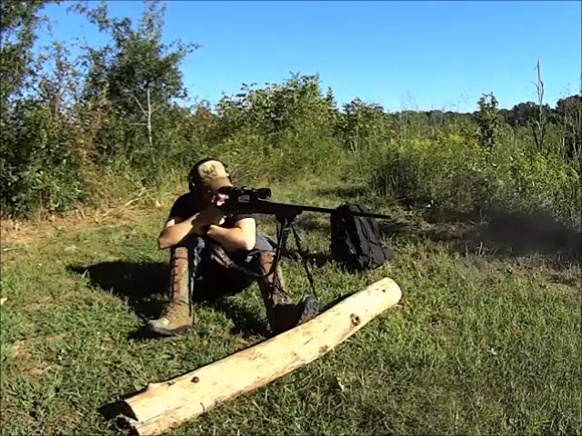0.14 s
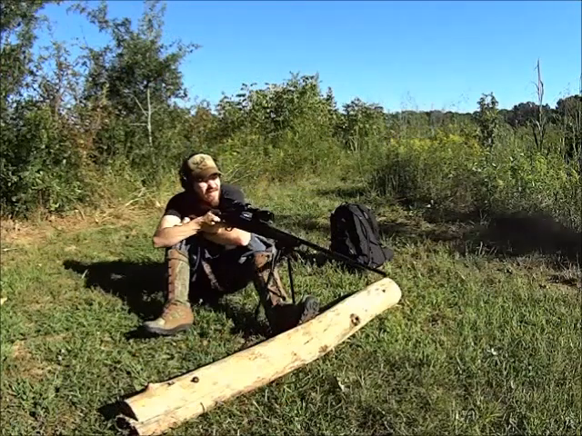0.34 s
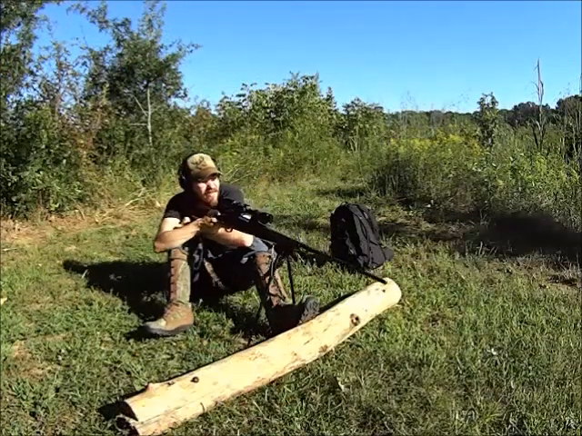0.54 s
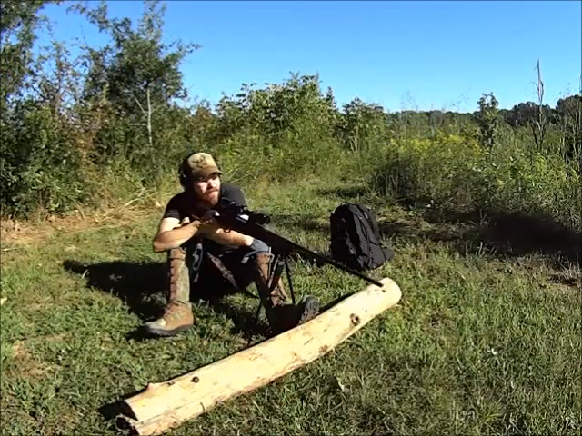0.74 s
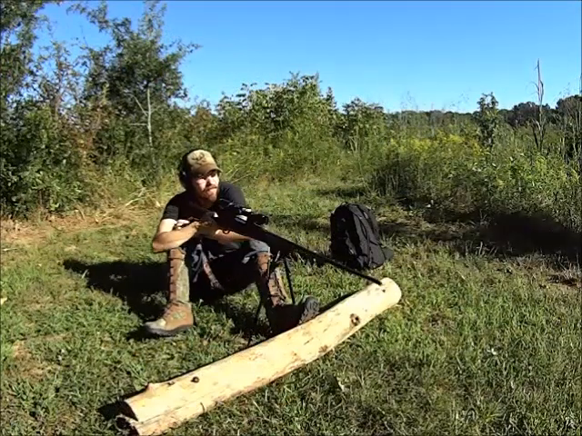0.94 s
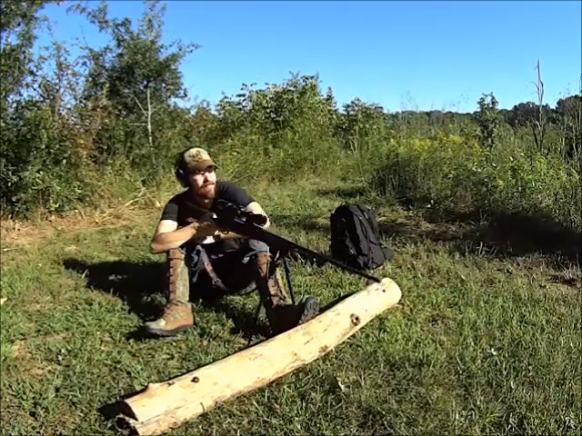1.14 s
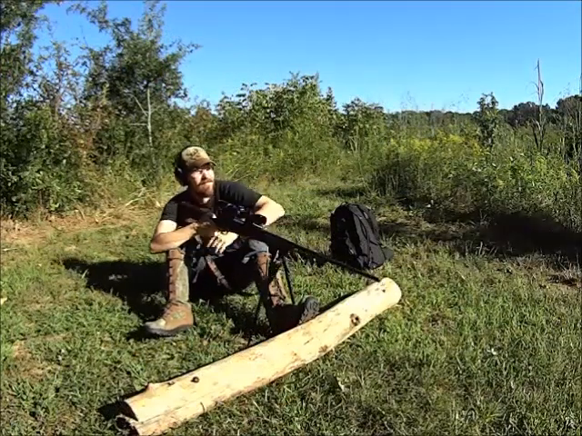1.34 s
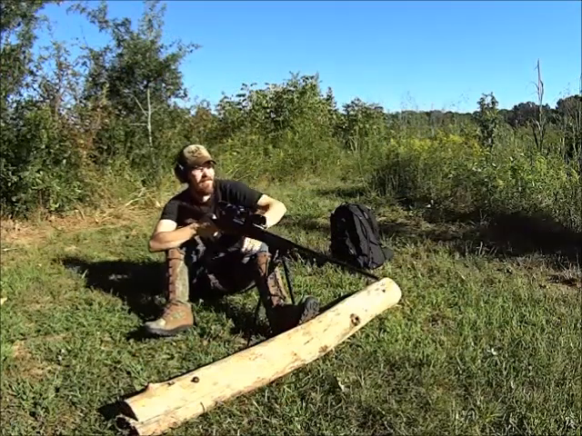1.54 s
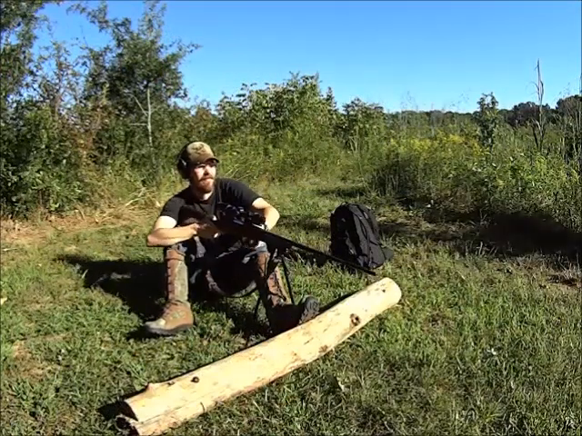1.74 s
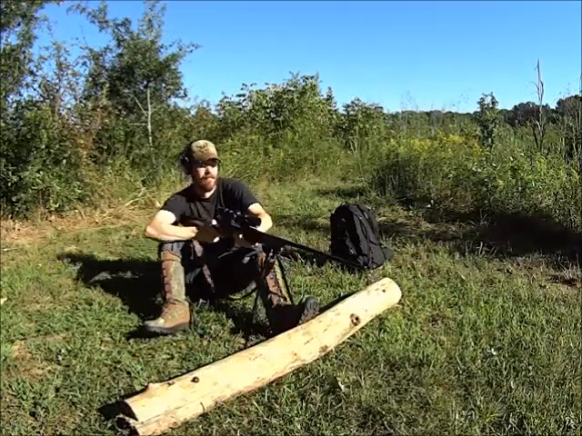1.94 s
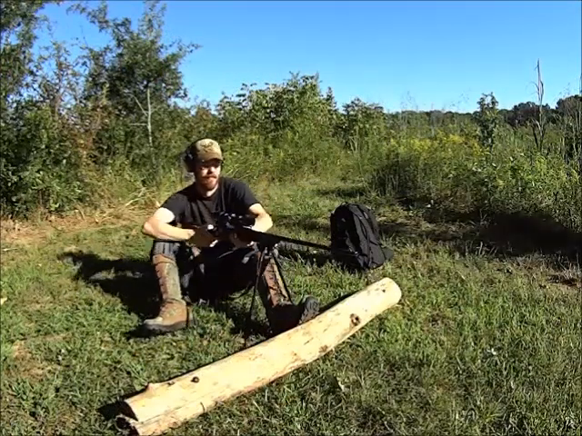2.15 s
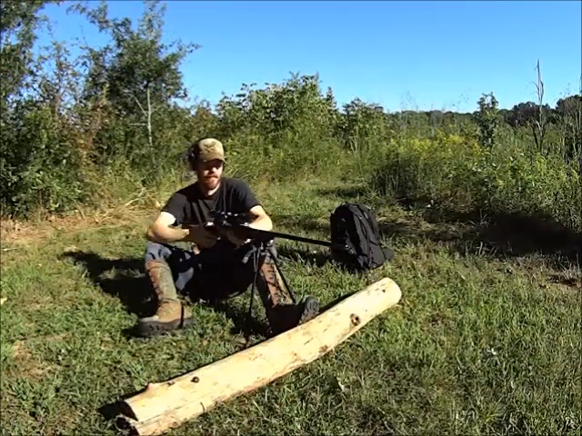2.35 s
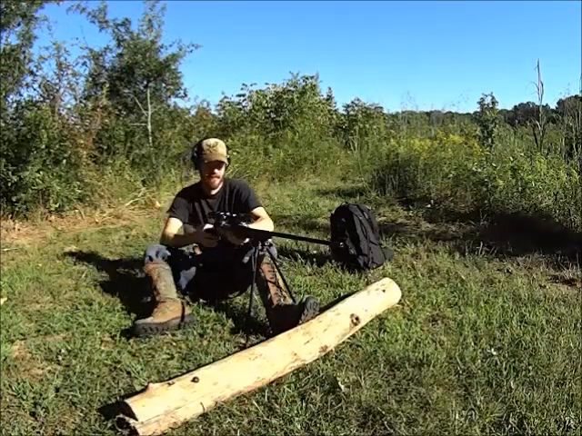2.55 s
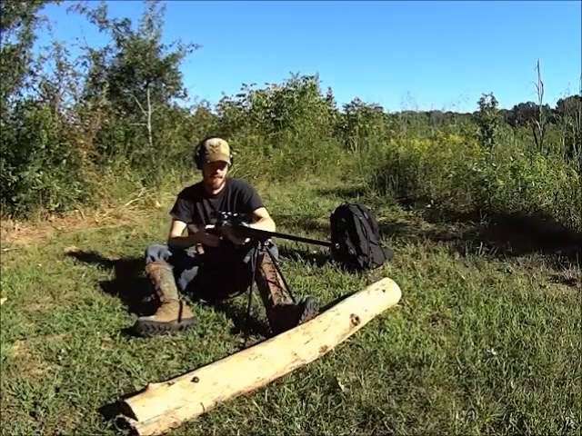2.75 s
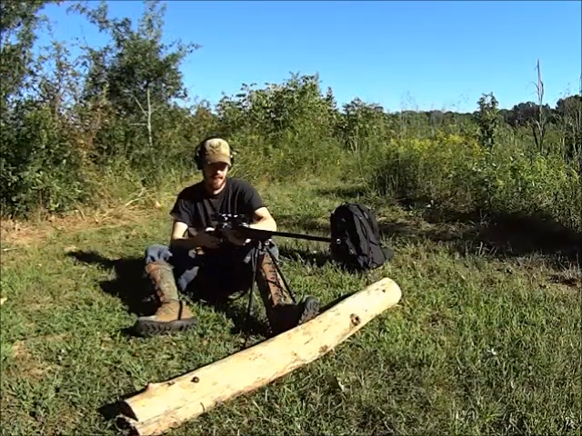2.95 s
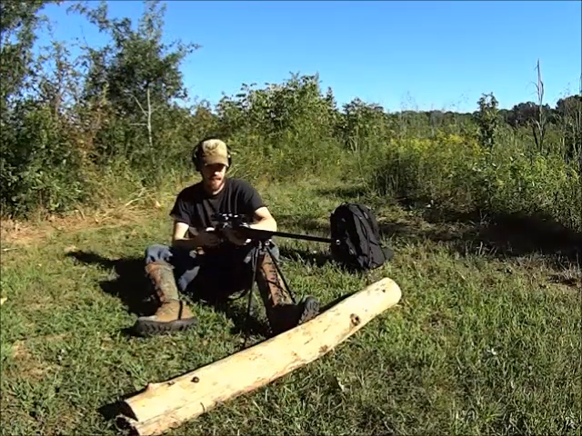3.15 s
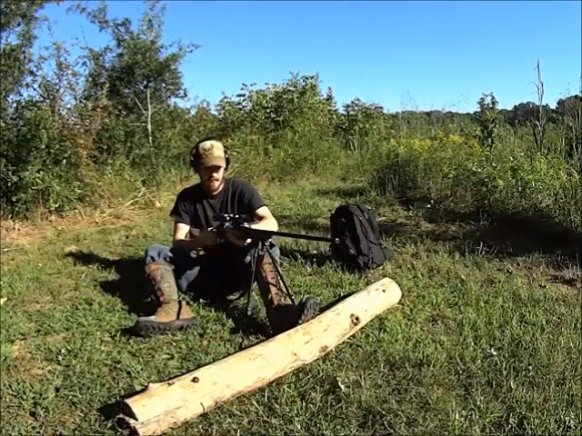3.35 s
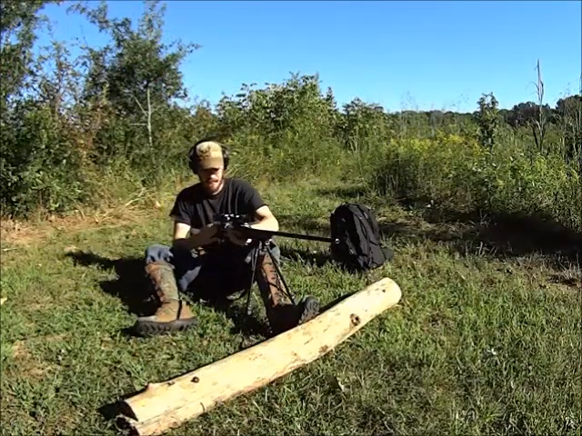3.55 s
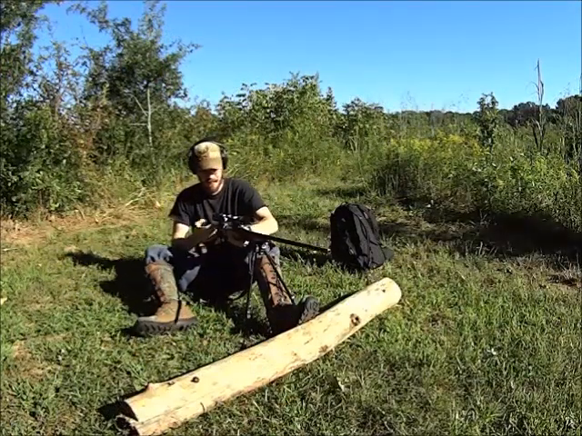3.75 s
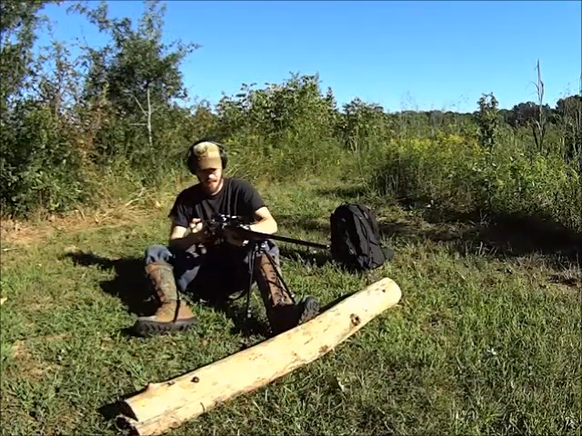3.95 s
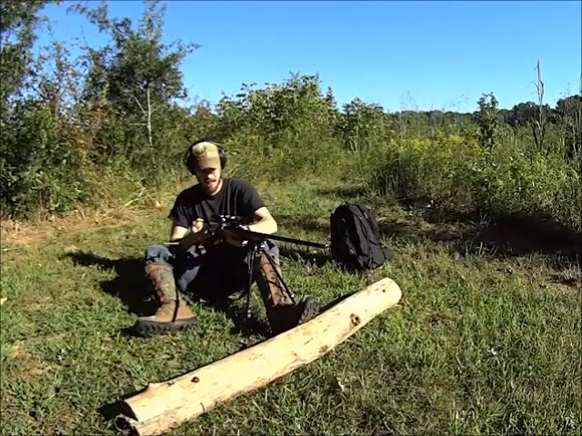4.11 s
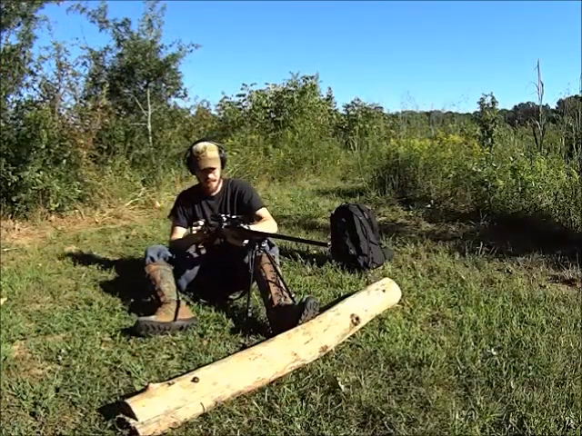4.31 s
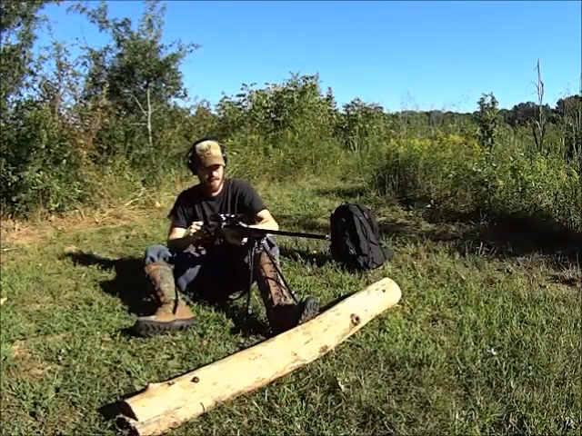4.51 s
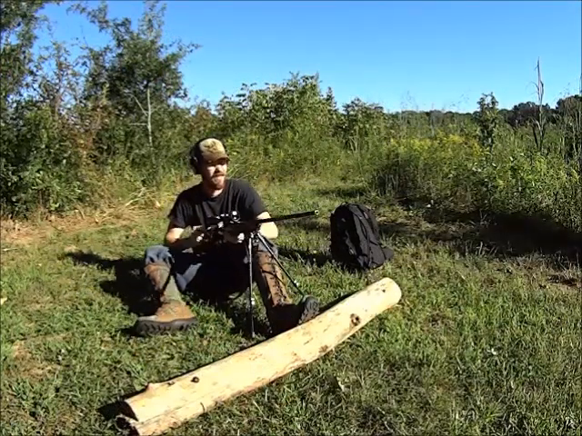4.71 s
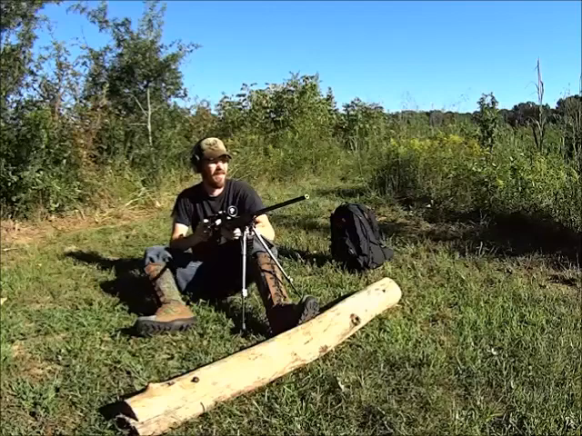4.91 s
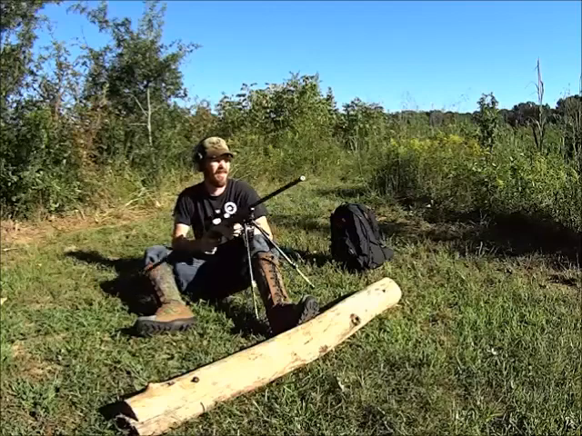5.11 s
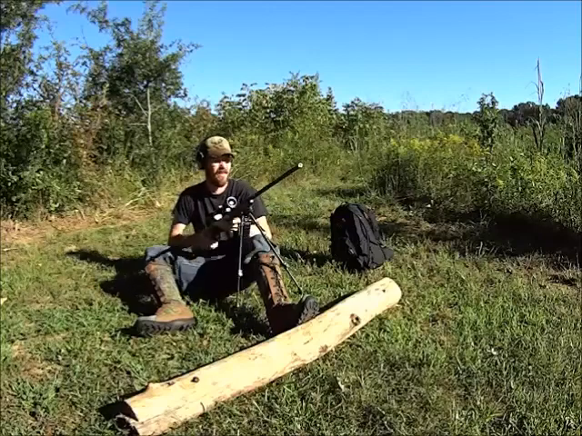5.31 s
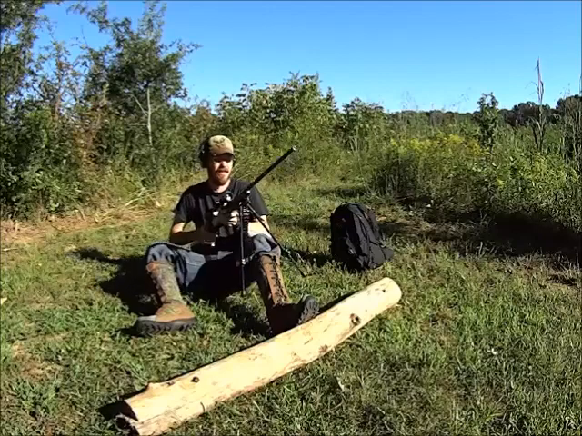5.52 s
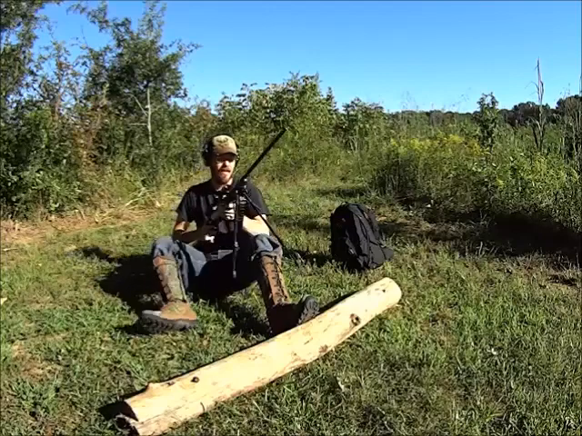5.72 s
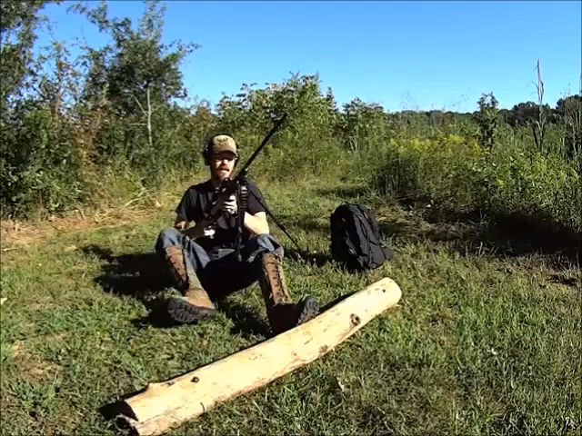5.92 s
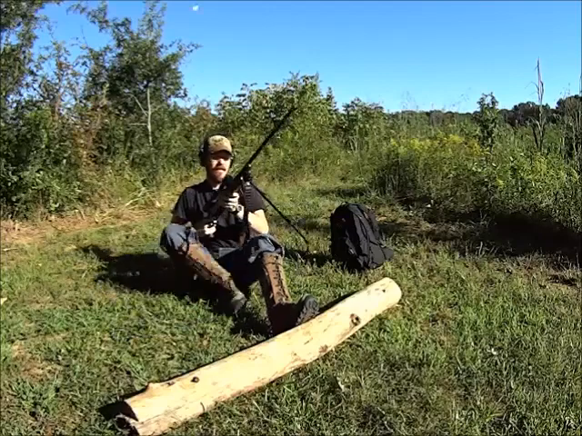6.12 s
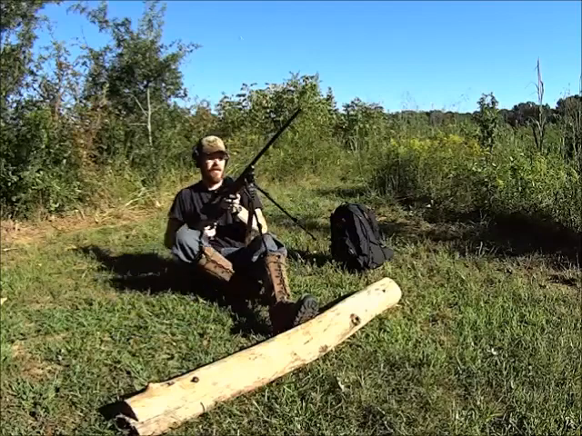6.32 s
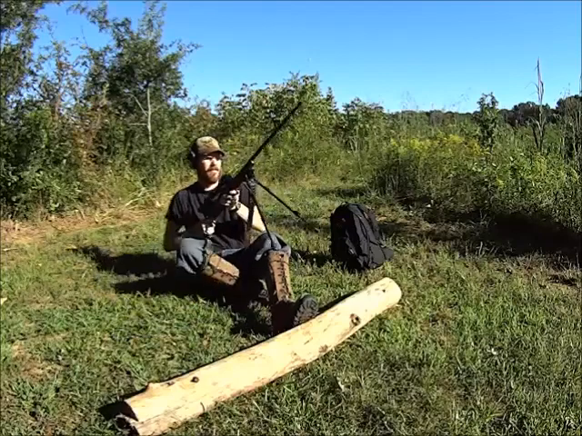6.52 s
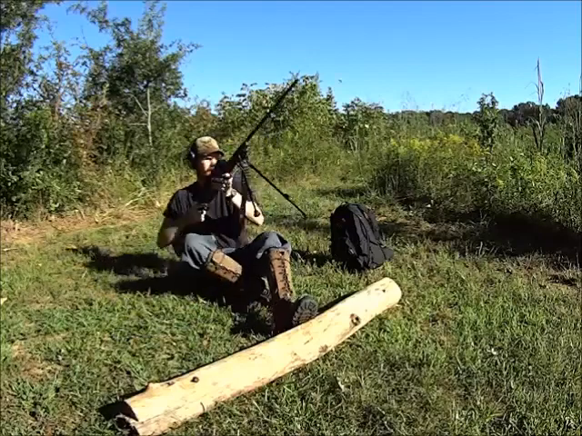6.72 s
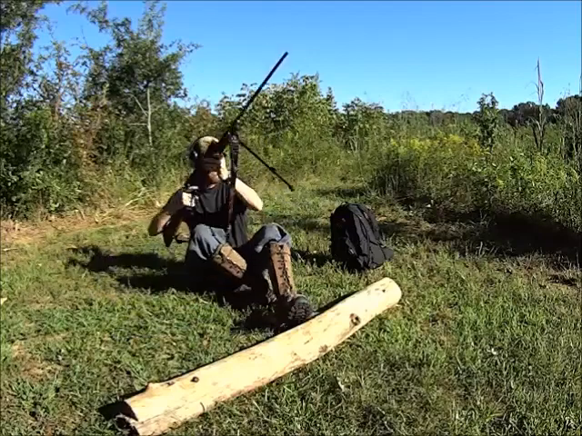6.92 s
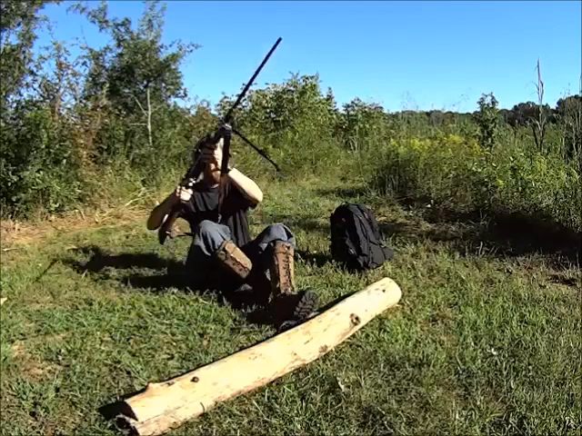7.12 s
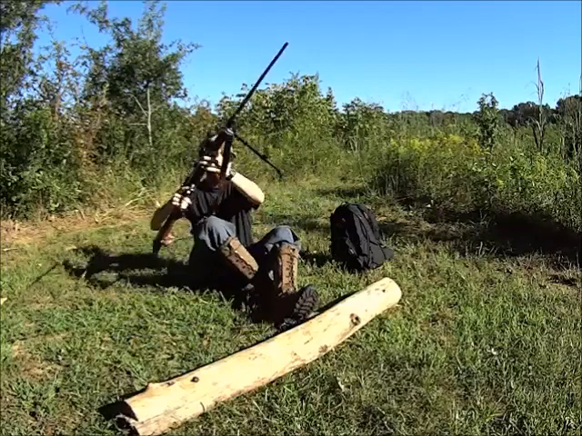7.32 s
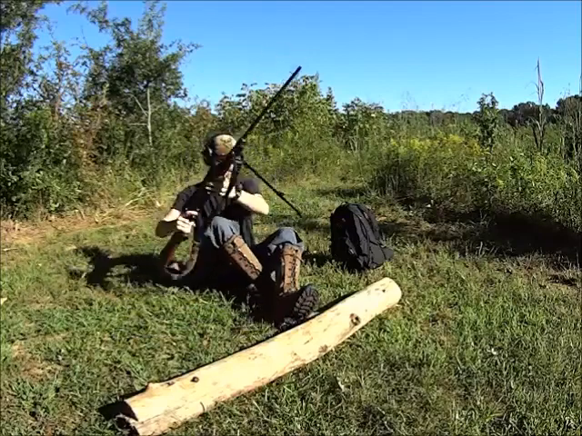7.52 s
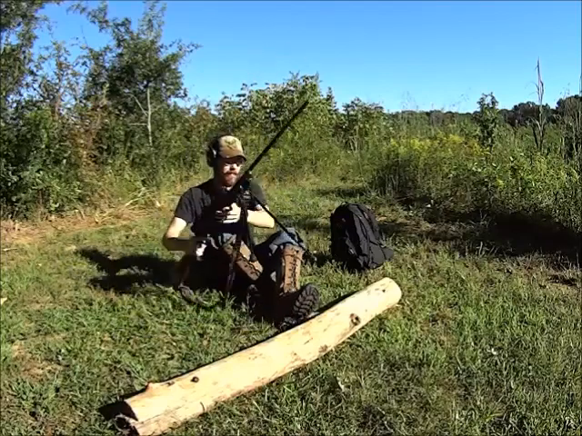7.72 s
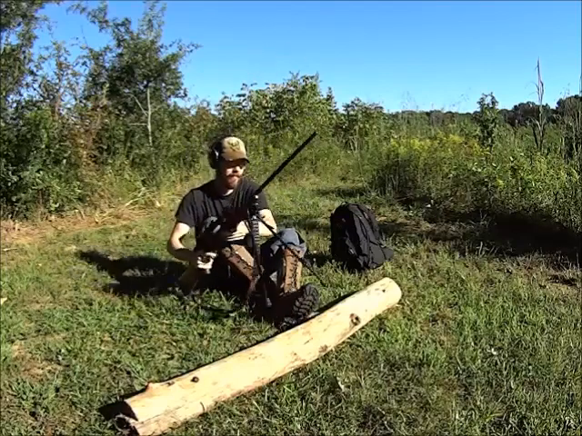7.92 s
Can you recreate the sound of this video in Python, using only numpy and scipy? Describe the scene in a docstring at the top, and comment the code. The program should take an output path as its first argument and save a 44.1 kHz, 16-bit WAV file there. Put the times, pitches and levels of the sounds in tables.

```python
"""A meadow edged by brush and tree lines, heard through a microphone pair.
Insects shrill over faint air and a low hum, all as shaped noise or sines, while an earlier shot still dies away.
One rifle shot: a noise crack, then a long roll of grainy echoes, duller the farther they travel.
The shooter works the bolt: bursts of steel-coloured noise clack, and decaying sines ring on.
The spent brass case rings in swelling sines and thuds on the ground; the bolt closes, a last catch clicks."""
import sys
import numpy as np
from scipy import signal
from scipy.fft import rfft, irfft, next_fast_len
from scipy.io import wavfile
from scipy.ndimage import uniform_filter1d

SR = 44100
rng = np.random.default_rng(int(sys.argv[2]) if len(sys.argv) > 2 else 0)


def generate_wav(signal):
    """Clip the signal to [-1, 1] and save it as 16-bit WAV at the path in sys.argv[1]."""
    frames = np.transpose(np.atleast_2d(signal))
    scaled = np.clip(frames, -1, 1) * 32767
    pcm = np.round(scaled).astype(np.int16)
    wavfile.write(sys.argv[1], SR, pcm)


N = 355446
TIME = np.arange(N) / SR
LEFT_SEED = np.array([[1], [0]])  # puts a sound in the first signal only, so both ports get the same wave

# Broad, well damped resonances of stock and action: (frequency [Hz], width [Hz], level [dB])
STEEL = [(733, 91, 8), (843, 140, 1.5), (1770, 420, 1.5), (1950, 390, 2), (2780, 210, 4.5),
         (3470, 440, 0.5), (4000, 220, -3.5), (5040, 900, 0), (7100, 1000, -1.5), (9580, 2500, -2.5)]
# The rifle as the microphone pair hears it: (frequency [Hz], likeness of the ports [0-1])
RIFLE = [(80, 0.26), (300, 1), (650, 0.86), (2000, 0.96), (10000, 0.83)]
# Phase by which the left port leads for the rifle: (frequency [Hz], lead [rad])
RIFLE_LEAD = [(170, 0.97), (500, 0.79), (1200, 1.43), (2000, 1.13), (3300, 0.38), (10000, 0.32)]
# Left port over right for the rifle: (frequency [Hz], level difference [dB])
RIFLE_PAN = [(300, 0.63), (1200, 3), (2300, 6.2), (4000, 1.8), (10000, 1)]


def amp(db):
    """Decibels to gain."""
    return 10 ** (np.asarray(db) / 20)


def unit(x):
    """Scales to rms 1."""
    return x / np.sqrt(np.mean(x ** 2) + 1e-20)


def read(points, hz):
    """Reads a (frequency, value) table on a log-frequency axis."""
    f, value = np.transpose(points)
    return np.interp(np.log(hz + 1), np.log(np.abs(f) + 1), value)


def add(mix, s, sound):
    """Mixes a sound in at time s."""
    part = mix[:, max(round(s * SR), 0):][:, :sound.shape[-1]]
    part += sound[..., :part.shape[1]]


def colour(x, spectrum):
    """Filters by a spectrum in dB."""
    size = x.shape[-1]
    padded = next_fast_len(size + 2048)
    gain = amp(read(spectrum, np.fft.rfftfreq(padded, 1 / SR)))
    return irfft(rfft(x, padded) * gain, padded)[..., :size]


def ports(x, same, lead=((1, 0),), pan=((1, 0),)):
    """Mixes two signals into the two microphone ports with a likeness, a phase lead and a pan."""
    size = next_fast_len(x.shape[1] + 2048)
    a, b = rfft(x, size)
    hz = np.fft.rfftfreq(size, 1 / SR)
    likeness = np.clip(read(same, hz), -1, 1)
    side = amp(read(pan, hz) / 2)
    right = likeness * a + np.sqrt(1 - likeness ** 2) * b
    right = right * np.exp(-1j * read(lead, hz))
    return irfft(np.array([a * side, right / side]), size)[:, :x.shape[1]]


def noise(size=N):
    """Two unrelated white noises."""
    return rng.standard_normal((2, size))


def bell(s, half):
    """A smooth swell around time s, down to 1/e at a distance of half."""
    return np.exp(-((TIME - s) / half) ** 2)


def meadow(air_db=-51.5, insect_trim_db=-1, waver_hz=2.05):
    """Air, insects and a wavering hum; the recorder's gain is low at first and lifts them from 1.2 to 3 s."""
    # Spectrum of the air, before it is set to rms 1: (frequency [Hz], level per Hz [dB])
    air_spectrum = [(15, -33), (25, -9), (55, -12.5), (81, 0.5), (101, -13), (149, -14), (422, -10.5),
                    (468, -8), (531, -8.5), (5970, -21.5), (6610, -19), (7320, -10.5), (8750, -22),
                    (11000, -24.5), (14300, -63), (22000, -120)]
    # Spectrum of the insects, before it is set to rms 1: (frequency [Hz], level per Hz [dB])
    insect_spectrum = [(5800, -44.5), (6400, -10), (6700, 0), (7050, -2.5), (7400, 2.5), (7900, -5),
                       (8300, -14), (9000, -40)]
    # Insects as the recorder's gain lets them through, before the trim: (time [s], level [dB])
    insect_levels = [(1.2, -60.5), (2, -56.5), (3, -54), (4.5, -54.5), (8, -54.5)]
    # Tones of the hum, before the shared gain: (frequency [Hz], rms level [dB])
    hum_tones = [(75.6, -61), (96.9, -69)]
    # The meadow at the microphone pair: (frequency [Hz], likeness of the ports [0-1])
    likeness = [(90, 0.85), (170, 0.47), (300, 0.11), (700, 0.84), (3500, 0.074), (7300, 0.56),
                (10000, 0.56)]
    # Phase by which the left port leads: (frequency [Hz], lead [rad])
    left_lead = [(170, 0.42), (430, 2.75), (1700, 2.14), (2600, 2.4), (5000, 0.64), (10000, 0.33)]

    s, db = np.transpose(insect_levels)
    middle_db = np.median(db)
    gain_db = np.interp(TIME, s, db) - middle_db
    air = unit(colour(noise(), air_spectrum)) * amp(air_db + gain_db)
    insects = unit(colour(noise(), insect_spectrum)) * amp(middle_db + insect_trim_db + gain_db)
    drift = np.interp(TIME, np.linspace(0, TIME[-1], num=60), rng.standard_normal(size=60))
    hum = np.zeros(N)
    for hz, level in hum_tones:
        phase = 2 * np.pi * np.cumsum(hz + waver_hz * drift) / SR
        hum += amp(level) * np.sqrt(2) * np.sin(phase)
    return ports(air + insects, likeness, left_lead) + hum * amp(gain_db)


def echoes(age, tilt_db, air_db=8, air_power=1.77, air_hz=4000, grain_db=1.7, tilt_hz=900):
    """Countless small echoes; the air takes more treble (air_db per s at air_hz) the longer they travel."""
    # Spectrum of the roar, before it is set to rms 1: (frequency [Hz], level per Hz [dB])
    roar = [(88, -37), (150, -14), (343, -7.5), (567, 1), (905, 0), (1210, -1.5), (1580, -4), (2300, -6.5),
            (2910, -10), (3300, -10), (5170, -14), (7820, -18.5), (11000, -24), (14300, -61), (22000, -120)]

    grain = unit(uniform_filter1d(rng.standard_normal(N), size=49))
    grains = noise() * amp(grain_db * grain)
    hz, t, z = signal.stft(unit(colour(grains, roar)), SR, nperseg=512)
    hz = hz[:, None]
    air_loss = air_db * np.interp(t, TIME, age) * (hz / air_hz) ** air_power
    octaves = np.clip(np.log2((hz + 1) / tilt_hz), -1, 2)
    z *= amp(tilt_db * octaves - air_loss)
    return signal.istft(z, SR, nperseg=512)[1][:, :N]


def boom(age, level_db=-41, hold_s=.45, fall_db_per_s=17, lump_db=3.5, lump_s=.025):
    """The bass of the blast rumbles on unevenly, and banks return single thumps."""
    # Spectrum of the bass, before it is set to rms 1: (frequency [Hz], level per Hz [dB])
    bass = [(21, -52.5), (35, -17), (53, -15.5), (86, -4), (156, -3), (291, 0.5), (350, -5.5), (460, -34),
            (770, -120)]
    # Dull thumps returned by banks: (time [s], level [dB], half length of the power swell [s])
    banks = [(0.123, -32, .012), (0.168, -29.5, 0.013), (.26, -34.5, 0.013), (0.663, -31.5, 0.0094),
             (0.837, -30, 0.0065)]

    lumps = unit(uniform_filter1d(rng.standard_normal(N), round(lump_s * SR)))
    fall_db = fall_db_per_s * np.maximum(age - hold_s, 0)
    rumble = amp(level_db - fall_db + lump_db * lumps)
    thump_power = sum(amp(db) ** 2 * bell(s, half) for s, db, half in banks)
    return unit(colour(noise(), bass)) * np.sqrt(rumble ** 2 + thump_power)


def shot(crack_db=-19, crack_fade=0.0083, roar_db=2):
    """A crack, then the roll from brush and tree lines over a low boom."""
    # Spectrum of the crack, before it is set to rms 1: (frequency [Hz], level per Hz [dB])
    crack_spectrum = [(59, -37), (100, 0), (1040, -10.5), (2890, 2.5), (4540, -1.5), (5980, -1.5),
                      (7140, 3), (8190, -2), (11000, 0), (14300, -36), (22000, -120)]
    # Single echoes from tree trunks and banks: (time [s], peak level [dB], pulse length [s])
    slaps = [(0.2, -17, 0.00016), (0.414, -24, 0.000078), (.583, -27, .00015), (0.6, -26, .00015),
             (0.825, -29, 0.0017)]
    # Stands of trees that throw back a surge: (time [s], rise [dB], half length [s])
    surges = [(0.4, 3, 0.12), (0.57, 2, 0.06), (0.758, 2.5, 0.015), (0.86, 2, 0.033), (1.063, 3, 0.048),
              (2.245, 2.2, 0.52)]
    # The open field at the microphone pair: (frequency [Hz], likeness of the ports [0-1])
    likeness = [(80, 0.9), (700, 1), (1500, 0.9), (3000, 0.3), (10000, .5)]
    # Phase by which the left port leads: (frequency [Hz], lead [rad])
    left_lead = [(80, 0.18), (200, 0.79), (500, 1.07), (1000, 1.55), (2300, 1.2), (4000, 0.66), (10000, .5)]
    # Left port over right: (frequency [Hz], level difference [dB])
    pan = [(60, 0.0), (220, -0.3), (830, -0.29), (3080, -1.5), (11400, -0.63)]

    shot_s, earlier_shot_s = .0968, -1.44  # the earlier shot is still dying away
    fired = TIME >= shot_s
    age = TIME - np.where(fired, shot_s, earlier_shot_s)
    # nearby brush holds for 0.55 s, then falls 23 dB per s; the far tree lines lose only 6 dB per s
    brush = echoes(age, tilt_db=2.3, air_db=9) * amp(-26.5 - 23 * np.maximum(age - .55, 0))
    far = echoes(age, tilt_db=-1.14, air_db=7.5) * amp(-32.5 - 6 * age)
    surge_db = sum(db * bell(s, half) for s, db, half in surges)
    roll = (brush + far) * amp(roar_db + surge_db) + boom(age)
    for s, db, length in slaps:
        u = TIME[:800] / length
        add(roll, s, amp(db) * (1 - u) * np.exp(-u) * LEFT_SEED)
    crack_decay = fired * np.exp(-(age / crack_fade) ** 2)
    crack = unit(colour(noise(), crack_spectrum)) * amp(crack_db) * crack_decay
    return ports(roll + crack, likeness, left_lead, pan)


def resonances(modes, stiff_hz=450):
    """Spectrum of a small body: its resonance peaks, and little radiation in the bass."""
    hz = np.geomspace(40, SR / 2, num=400)
    power = sum(amp(db) ** 2 / (1 + (2 * (hz - f) / width) ** 2) for f, width, db in modes)
    return np.transpose([hz, 10 * np.log10(power / (1 + (stiff_hz / hz) ** 2))])


def scrape(size, bright_hz, tilt_db=7.0, centre_hz=4000):
    """Rubbing on the rifle; a bright_hz above centre_hz tilts its spectrum up, one below tilts it down."""
    hz, db = np.transpose(resonances(STEEL))
    db = db + tilt_db * np.log2(bright_hz / centre_hz) * np.log2(hz / centre_hz)
    return unit(colour(noise(size), np.transpose([hz, db])))


def handling():
    """Soft swells of rubbing as the shooter shifts the rifle."""
    # Sleeves and hands rubbing: (time [s], level [dB], half length [s], brightness [Hz])
    rustles = [(2.477, -53.5, 0.1, 7000), (3.292, -47.5, 0.089, 5960), (3.844, -50, 0.075, 2880),
               (4.798, -52, 0.12, 4600), (5.834, -59, 0.13, 6000), (6.257, -49.5, 0.037, 6500),
               (6.448, -53.5, 0.024, 2800), (6.823, -58, 0.087, 1980), (6.948, -56, 0.074, 5000),
               (7.568, -58, 0.027, 2160)]

    out = np.zeros((2, N))
    t = TIME[:SR // 2] - 1 / 4
    for s, db, length, bright_hz in rustles:
        add(out, s + t[0], amp(db) * scrape(len(t), bright_hz) * np.exp(-(t / length) ** 2))
    return ports(out, RIFLE, RIFLE_LEAD)


def rattles(count=5, fade_s=0.008, spread_db=2.5, jitter_s=0.00054):
    """Each slide of the bolt along its track is a quick, uneven run of small clacks."""
    # Slides of the bolt: (time [s], length [s], level [dB], hardness [dB])
    slides = [(3.899, .06, -32, 3), (4.863, .035, -31, 0)]

    run = []
    for s, length, db, hard in slides:
        for k, (late, strong) in enumerate(rng.standard_normal((count, 2))):
            at = s + length * k / count + jitter_s * late
            run.append((at, fade_s, db + spread_db * strong, hard))
    return run


def action(level_db=0.5, rise=.0005, ring_db=-27, scatter_db=-20, scatter_t60=0.42):
    """Each clack is a few milliseconds of chatter; the steel rings on and the brush scatters it back."""
    # Steel on steel: (time [s], fade [s], level before trims [dB], hardness: more zing, less knock [dB]).
    # The hand finds the bolt (2.8-3.3 s), lifts it (3.51), draws it back (3.90); it hits the stop and
    # ejects the case (3.94), is pushed home (4.70-4.90) and locked down (5.05-5.10).
    clacks = [(2.782, 0.0066, -44, -10), (2.813, 0.0065, -43, -12), (3.271, 0.0079, -42, 9),
              (3.5123, 0.0071, -21.5, 6.5), (3.5171, 0.0083, -23.5, 5.5), (3.5198, 0.0076, -26.5, -11.5),
              (3.8951, 0.004, -23, 2), (3.9065, 0.0071, -21, 1), (3.9159, 0.0063, -23, -1),
              (3.9361, 0.0026, -20.5, 4.5), (3.9407, 0.0061, -18.5, -0.5), (3.9608, .006, -22, 3),
              (4.696, 0.0036, -39, -3), (4.703, 0.0072, -40.5, -3), (4.827, 0.011, -40, -4),
              (4.8998, 0.0058, -18.5, 2), (5.045, .0062, -43, -4), (5.0625, 0.014, -35, -2),
              (5.081, 0.01, -35.5, -3), (5.098, 0.0062, -17, -0.5)]
    # Ring of receiver and barrel: (frequency [Hz], level before ring_db [dB], t60 [s])
    receiver = [(356, -7, 0.31), (662, 2, 0.12), (805, -5, 0.17), (1530, -6, 0.39), (1900, -11, 0.81),
                (2094, -11, 0.28), (2700, 2, 0.17), (3770, -5, 0.3), (4630, -11, .3), (5276, -14, 0.27),
                (5560, -3, 0.22)]
    # Bolt and sling hardware stick and squeak: (time [s], level [dB], pitch [Hz], half length [s])
    squeaks = [(3.907, -16, 7200, .002), (3.939, -15, 5600, 0.001), (4.754, -37.5, 1940, .0026),
               (4.836, -26, 5280, 0.0013), (5.07, -30.5, 810, 0.002), (7.642, -52, 4670, 0.0057)]

    direct, tail = np.zeros((2, N)), np.zeros((2, N))
    t = TIME[:SR // 2]
    steel = colour(noise(), resonances(STEEL))
    layers = []
    for band in [(100, 1300), (1300, 6000), (6000, 12000)]:  # knock, clack, zing (Hz)
        sos = signal.butter(N=4, Wn=band, btype="band", fs=SR, output="sos")
        layers.append(unit(signal.sosfilt(sos, steel)))
    knock_clack_zing = np.array(layers)
    for s, fade, db, hard in clacks + rattles():
        start = rng.integers(N - len(t))
        chatter = knock_clack_zing[..., start:start + len(t)]
        strength = amp(db + np.array([-8 - hard, 0, -6 + hard]))[:, None, None]
        burst = chatter * (1 - np.exp(-t / rise)) * np.exp(-(t / fade) ** 2)
        # the fade sets the energy of each blow
        burst *= np.sqrt(fade * SR / np.sum(burst ** 2, -1, keepdims=True) / 2)
        ring = np.zeros(len(t))
        for hz, mode_db, t60 in receiver:
            ring += amp(mode_db - 60 * t / t60) * np.sin(2 * np.pi * (hz * t + rng.random()))
        add(direct, s - rise, amp(level_db) * (strength * burst).sum(0))
        add(direct, s, amp(db + ring_db) * ring * LEFT_SEED)
        add(tail, s, (strength * chatter).sum(0) * amp(scatter_db - 60 * t / scatter_t60))
    t = TIME[:SR // 20] - 1 / 40
    for s, db, hz, length in squeaks:
        squeak = np.sin(2 * np.pi * hz * t) * np.exp(-(t / length) ** 2)
        add(direct, s + t[0], amp(db) * squeak * LEFT_SEED)
    scattered = ports(tail, [(300, 0.19), (8000, 0.65)], RIFLE_LEAD)  # (Hz, likeness)
    return ports(direct, RIFLE, RIFLE_LEAD, RIFLE_PAN) + scattered


def case(tumble=0.53, pan_db=1.5, soil_hz=210, soil_db=-7, thud_fade=0.00076, soil_fade=0.0016):
    """The spinning case rings in swells, then lands twice on the soil."""
    # The empty case: (frequency [Hz], level [dB], undamped t60 [s], swell rate as it tumbles [Hz])
    brass = [(7118, -3, .25, 20), (9430, 0, .2, 40), (9915, -10, .14, 40)]
    # Knocks that set the case ringing: (time [s], level [dB], time until it is damped [s])
    case_hits = [(3.895, -23, 0.018), (3.925, -18, 0.07), (3.962, -9, 0.21), (4.228, -40, 0.062)]
    # The case lands and bounces: (time [s], level before the ground's filter [dB], pitch [Hz])
    landings = [(4.2305, -17.5, 1080), (4.2542, -18, 1380)]

    rings, thuds = np.zeros((2, N)), np.zeros((2, N))
    t = TIME[:SR // 2]
    ring = np.zeros(len(t))
    for hz, mode_db, t60, spin in brass:
        swell = 1 + tumble * np.cos(2 * np.pi * spin * t)
        ring += amp(mode_db - 60 * t / t60) * np.sin(2 * np.pi * hz * t) * swell
    clear = 1 - 0.82 * np.exp(-t / 0.022)  # the ring opens up as the case leaves the rifle
    for s, db, free in case_hits:
        damping = np.exp(-(t / free) ** 2)
        add(rings, s, amp(db) * ring * clear * damping * amp([[pan_db], [-pan_db]]))
    for s, db, hz in landings:
        tap = np.cos(2 * np.pi * hz * t) * np.exp(-t / thud_fade)
        push = amp(soil_db) * np.sin(2 * np.pi * soil_hz * t) * np.exp(-t / soil_fade)
        add(thuds, s, amp(db) * (push - tap) * LEFT_SEED)
    dull = colour(thuds, [(2000, -1), (6000, -7), (10000, -14)])  # (Hz, dB)
    return rings + ports(dull, RIFLE, RIFLE_LEAD, RIFLE_PAN)


def catch(fade=0.002, rise=.0013, scatter_db=-27, scatter_t60=0.15):
    """One light, bright snap of a small lever, with a faint scattered tail."""
    # Modes of the small catch that snaps last: (frequency [Hz], width [Hz], level [dB])
    lever = [(805, 200, 0.5), (1400, 210, 1.5), (2290, 250, -2), (2880, 260, -3), (4760, 330, 2),
             (6100, 500, -5), (7750, 600, -2), (8850, 550, -6), (10400, 600, -2.5)]

    catch_s, catch_db = 6.1329, -21.5
    out = np.zeros((2, N))
    t = TIME[:SR // 2]
    snap = (1 - np.exp(-t / rise)) * np.exp(-t / fade) * 2
    scatter = amp(scatter_db - 60 * t / scatter_t60)
    texture = unit(colour(noise(len(t)), resonances(lever)))
    add(out, catch_s - rise, amp(catch_db) * (snap + scatter) * texture)
    return ports(out, RIFLE, RIFLE_LEAD, RIFLE_PAN)


def scene():
    """The meadow, the shot across it and the work on the rifle."""
    return meadow() + shot() + handling() + action() + case() + catch()


def record(dry, edge_hz=11130):
    """The recorder's band limit: a steep low-pass."""
    lowpass = signal.firwin(601, edge_hz, window=("kaiser", 8), fs=SR)
    return signal.oaconvolve(dry, lowpass[None], "same")


dry = scene()
out = record(dry)
generate_wav(out)
```